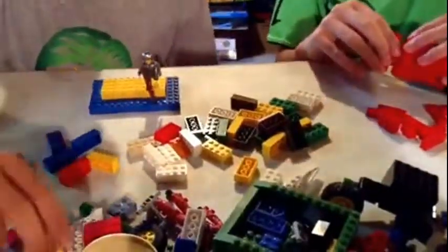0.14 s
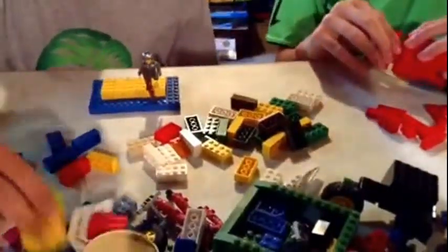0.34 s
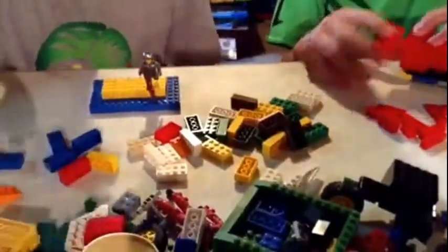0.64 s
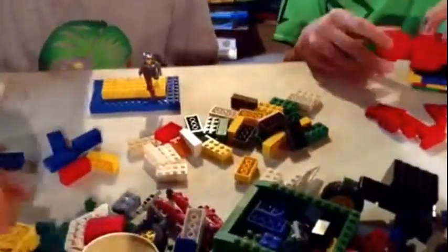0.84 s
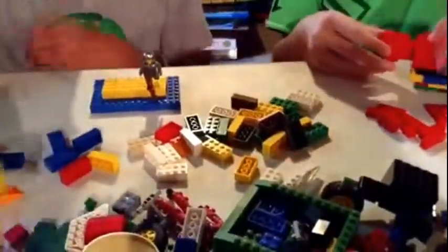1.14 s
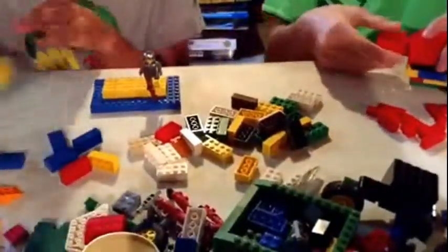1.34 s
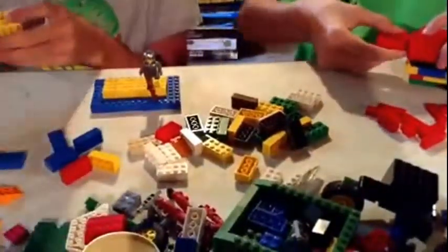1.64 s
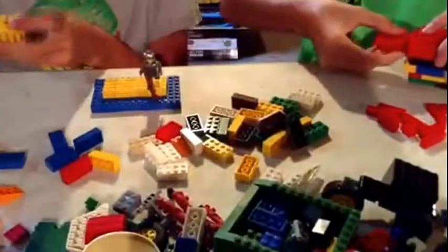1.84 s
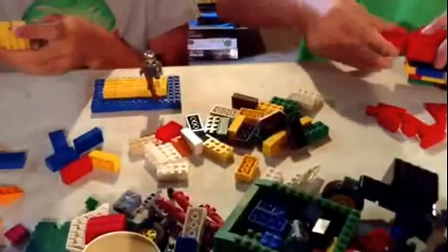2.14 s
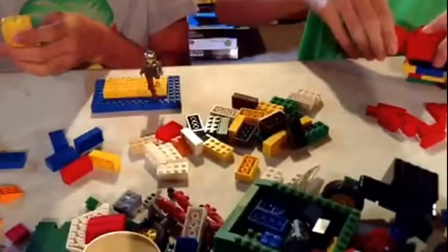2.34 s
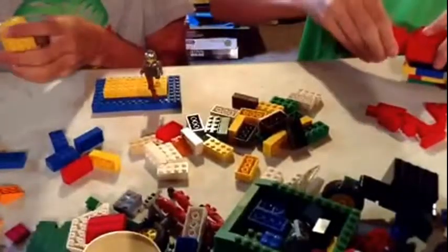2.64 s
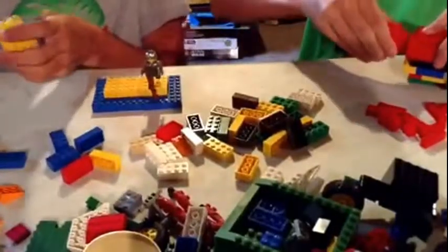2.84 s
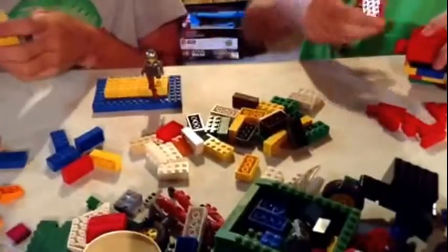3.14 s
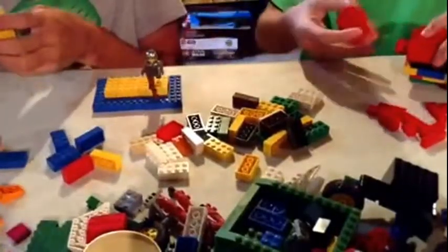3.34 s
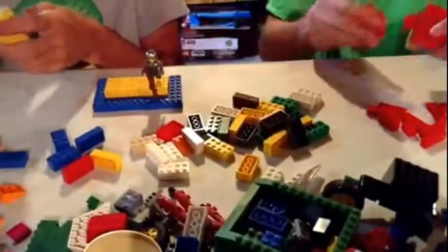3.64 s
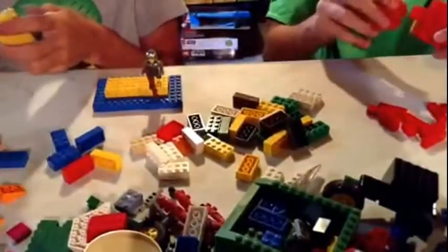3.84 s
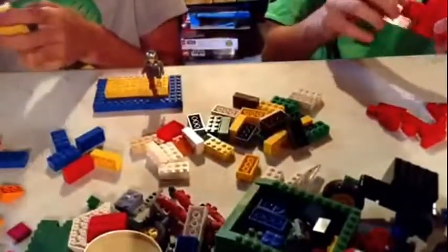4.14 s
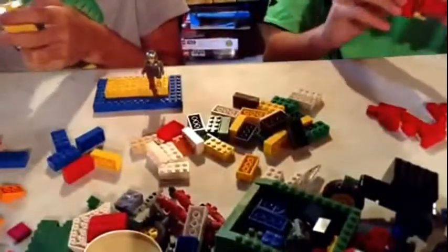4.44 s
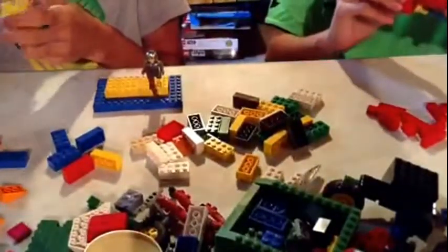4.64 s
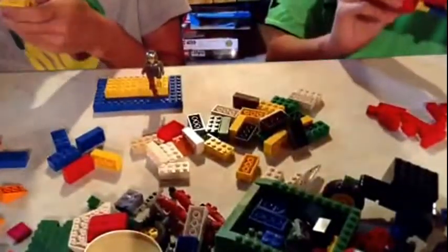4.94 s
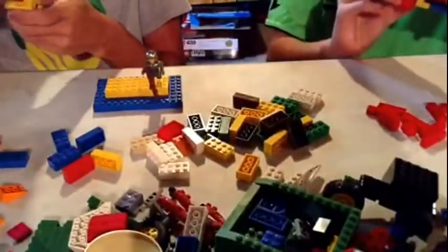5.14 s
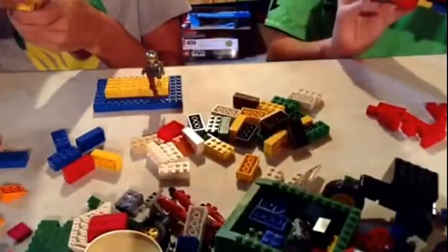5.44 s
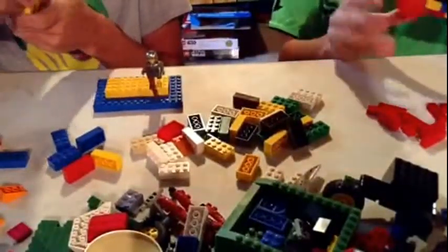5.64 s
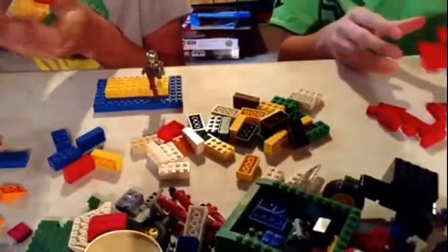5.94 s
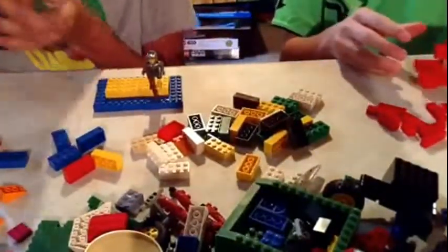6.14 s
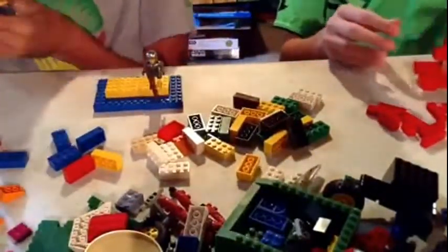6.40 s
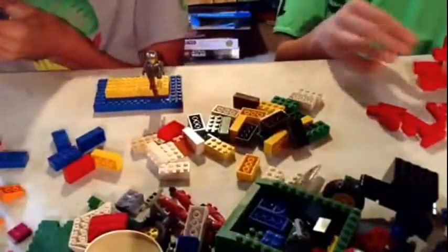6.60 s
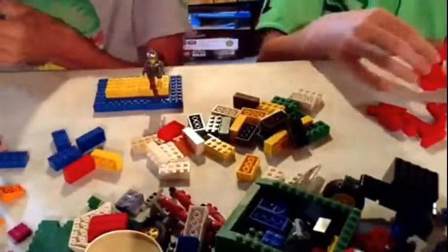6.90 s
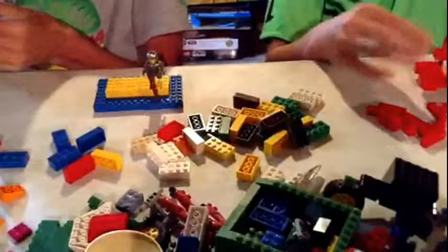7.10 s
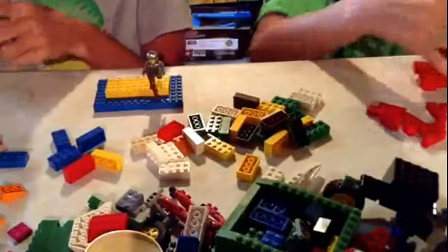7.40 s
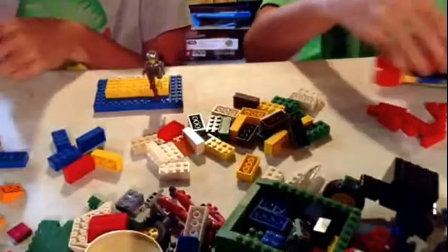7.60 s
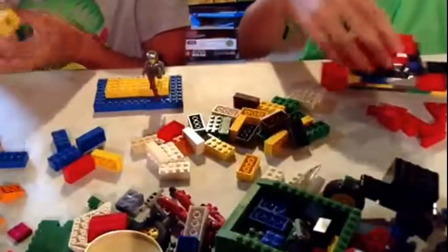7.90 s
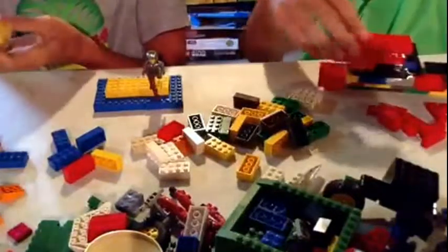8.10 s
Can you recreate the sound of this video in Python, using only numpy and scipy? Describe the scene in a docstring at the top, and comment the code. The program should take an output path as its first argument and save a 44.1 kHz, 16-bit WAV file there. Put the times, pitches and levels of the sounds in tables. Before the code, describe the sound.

Plastic building bricks crack and rattle in three quick flurries as they are pressed together, pulled apart and pushed over a wooden tabletop. After the third and sharpest flurry, isolated clicks and soft rubbing follow, then a dull knock and a brief slide. A fan hums quietly in the small, slightly echoing room, and the sound is mono from a close phone microphone.

```python
"""Hollow plastic bricks are pressed together, pulled apart and pushed over a wooden table by four hands.
Each contact cracks, rings the brick's hollow and thumps the table top.
Dragged bricks scrape the wood and rattle; held ones rub against each other.
The small living room echoes, a fan hums in the background, and a phone close by records in mono."""
import sys
import numpy as np
from scipy import signal
from scipy.fft import rfft, irfft
from scipy.io import wavfile
from scipy.ndimage import uniform_filter1d

SR = 44100
rng = np.random.default_rng(int(sys.argv[2]) if len(sys.argv) > 2 else 0)


def generate_wav(sig):
    """Save sig (samples, or channels by samples) to the path in sys.argv[1] as 16-bit PCM at SR."""
    pcm = np.round(np.clip(np.atleast_2d(sig).T, -1, 1) * 32767).astype(np.int16)
    wavfile.write(sys.argv[1], SR, pcm)


N = 364266
TOP_HZ = 15400  # the highest pitch the phone keeps


def undb(db):
    """Turn decibels into a number to multiply by."""
    return 10 ** (np.asarray(db) / 20)


def unit(x):
    """Scale to an average (rms) level of 1."""
    return x / np.sqrt(np.mean(x ** 2))


def peak(x):
    """Scale each row to a peak of 1."""
    return x / np.abs(x).max(axis=1, keepdims=True)


def resonate(x, tones):
    """Let x ring at each (pitch, width, level); every second tone is flipped."""
    return sum((-1) ** k * undb(db) * signal.lfilter(*signal.iirpeak(hz, hz / width, SR), x)
               for k, (hz, width, db) in enumerate(tones))


def wander(per_s):
    """A smooth random wobble, about 1 in size."""
    hold = int(SR / per_s)
    steps = np.repeat(rng.standard_normal(N // hold + 1), hold)
    return 1.3 * uniform_filter1d(uniform_filter1d(steps, hold), hold)[:N]


def clicks(per_s, spread_db):
    """Tiny random clicks, a few louder than the rest."""
    happens = rng.random(N) < per_s / SR
    size = undb(spread_db * np.minimum(rng.exponential(size=N), 3))
    return unit(happens * size * np.sign(rng.standard_normal(N)))


def shove(t, start, length, rise_s, fall_db_per_s):
    """The strength of a hand's push: it rises, holds, then fades."""
    return np.clip((t - start) / rise_s, 0, 1) * undb(-fall_db_per_s * np.maximum(t - start - length, 0))


# The tones of the fan's hum: (pitch [Hz], level [dB])
FAN_TONES = [(232.8, -55.5), (1335, -71)]
# How strong the rushing air is, from low to high: (pitch [Hz], relative level [dB])
FAN_AIR = [(60, -28), (90, -36), (145, -24), (200, -18.5), (330, -25), (770, -27.5), (1300, -32),
           (1700, -34), (2300, -41), (5000, -43.5), (14800, -49), (16000, -72)]


def fan(air_db=-54, flicker_below_hz=1800):
    """A fan's wavering hum over rushing air, whose low part flickers a little."""
    t, freqs = np.arange(N) / SR, np.fft.rfftfreq(N, 1 / SR) + 1
    hum = sum(np.sqrt(2) * undb(db + 1.5 * wander(22)) * np.sin(2 * np.pi * hz * t + .5 * wander(2.6))
              for hz, db in FAN_TONES)
    hz, db = np.transpose(FAN_AIR)
    spectrum = rfft(rng.standard_normal(N)) * undb(np.interp(np.log(freqs), np.log(hz), db))
    low = 1 / (1 + (freqs / flicker_below_hz) ** 4)
    air = irfft(spectrum * low, N) * undb(0.17 * wander(14)) + irfft(spectrum * (1 - low), N)
    return hum + undb(air_db) * unit(air)


def plastic_crack(t, rise, treble_db, slip_s=0.0041, shell_fade_s=0.013, low_hz=2200, treble_hz=7000):
    """Plastic slips in tiny jerks and its thin shell rings. Gives the near sound and the one to echo."""
    count = len(treble_db)
    noise = rng.standard_normal((count, len(t)))
    slips = np.sign(noise) * np.abs(noise) ** 1.4 * rise * np.exp(-t / slip_s)  # spiky noise
    slips /= np.linalg.norm(slips, axis=1, keepdims=True)
    pitch, phase = rng.random((2, count, 8, 1))  # eight random shell tones per contact
    shell = np.sin(2 * np.pi * (low_hz * 6.5 ** pitch * t + phase)).sum(axis=1)
    shell *= rise * undb(-60 * t / shell_fade_s)
    shell *= undb(-2) / np.linalg.norm(shell, axis=1, keepdims=True)
    # over all directions, the slips even out to one plain click
    to_walls = np.zeros_like(slips)
    to_walls[:, 0] = undb(0.5)
    crack = signal.lfilter(*signal.butter(2, low_hz, "high", fs=SR), [slips + shell, to_walls])
    treble = signal.lfilter(*signal.butter(1, treble_hz, "high", fs=SR), crack)
    return undb(8) * (crack + (undb(treble_db) - 1) * treble)


# The tones of a brick's hollow: (pitch [times the main pitch], level [dB], time to fade by 60 dB [s])
HOLLOW_TONES = [(1, -2.5, 0.0094), (1.2, -9.5, 0.0041), (.82, -10.5, 0.0062)]


def hollow_ring(t, rise, hz):
    """The hollow rings briefly; bricks differ in shape, so the side tones shift a little."""
    ring = 0
    for k, (ratio, db, fade_s) in enumerate(HOLLOW_TONES):
        phase, shape = rng.standard_normal((2, len(hz), 1))
        shift = 1 + .08 * np.tanh(shape) if k else 1
        ring += undb(db - 60 * t / fade_s) * np.sin(2 * np.pi * (ratio * shift * hz * t + phase))
    return peak(ring * rise ** 2)


# The tones of the table top, then of its frame: (pitch [Hz], width [Hz], level [dB])
TOP_TONES = [(255, 88, 0.5), (381, 200, 2), (440, 200, 3.5), (573, 292, 5), (794, 437, 6.5),
             (972, 290, 5.5), (1310, 373, -3.5), (1970, 700, -14.5)]
FRAME_TONES = [(144, 34, 4), (280, 480, -1.5), (396, 192, 3)]
# The note of each spot where bricks land: (from time [s], pitch [Hz], level next to the thump [dB])
LANDING_SPOTS = [(0, 600, -0.5), (.535, 359, 0.5), (.56, 263, 2), (.6, 520, 4), (.63, 350, -2),
                 (.67, 377, -2.5), (.7, 600, -2.5), (.79, 262, 5.5), (.85, 810, -6.5), (1.9, 900, -12),
                 (3.3, 663, -6.5), (3.404, 920, -4.5), (3.5, 905, -2.5), (3.55, 291, 10.5), (4, 280, -3),
                 (7, 650, -0.5)]


def table_thump(t, starts, thump_db, push_s=0.003, spot_fade_s=0.033):
    """A short push shakes the table top; the heavier it is, the more it reaches the frame."""
    push = rng.standard_normal((len(starts), len(t))) * np.exp(-t / push_s)
    top = peak(resonate(push, TOP_TONES))
    frame = undb(0.48 * thump_db - 12) * peak(resonate(push, FRAME_TONES))
    since, spot_hz, spot_db = np.transpose(LANDING_SPOTS)
    spot = np.clip(np.searchsorted(since, starts) - 1, 0, None)
    hz = spot_hz[spot] * (1 + .03 * rng.standard_normal(starts.shape))
    note = undb(spot_db[spot] - 60 * t / spot_fade_s) * np.sin(2 * np.pi * hz * t)
    return undb(thump_db) * (top + frame + note)


# Each time a brick hits something; ring, thump and treble count up or down from its level:
# (time [s], level [dB], ring [dB], pitch of the hollow [Hz], thump [dB], crack's treble [dB])
BRICK_CONTACTS = [(0.043, -45.5, 2, 4750, -1.5, 14), (0.055, -26, -27, 3240, -22.5, -0.5),
                  (0.124, -34.5, -19, 4500, -20, -6), (0.2108, -41.5, -6, 2970, 1.5, 8),
                  (0.347, -32.5, -21, 5740, -9.5, -5), (.3661, -33, -1, 3600, -12, 13),
                  (0.38, -30.5, -1, 3150, -3.5, -1), (.403, -22, -4, 3220, -15, -22),
                  (.482, -5.5, -12, 3800, -18.5, -16), (.494, -13.5, -4, 3670, -13, -10),
                  (0.5266, -11.5, -8.5, 2190, -9, 8), (0.5433, -4.5, -11.5, 4630, -6.5, -16),
                  (0.5753, -27.5, -12, 2250, 5.5, -11), (0.6069, -31, 2, 2200, 3.5, -21),
                  (0.637, -11, -11, 3830, -1, -19), (0.6497, -7, -11, 4450, -28, 4.5),
                  (.6664, -4, -23, 2740, -7.5, -15), (0.6746, -0.5, -10.5, 2640, -10.5, -9),
                  (0.7121, -14.5, -17, 2460, -1, 0), (0.7347, -10.5, -14, 2260, -5, -21),
                  (0.8003, -25, -6, 2580, 4, -21), (0.9043, -45, -17, 3040, 19.5, -14),
                  (1.096, -20, -7, 4500, -13, -1.5), (1.117, -26.5, -0.5, 2260, -2, -13),
                  (1.169, -52.5, -12, 2080, 19.5, -9), (1.3409, -42, -7, 2330, 7.5, -17),
                  (1.5325, -28, -1, 4500, -17, 5.5), (1.945, -34.5, -6.5, 2630, -6.5, -19),
                  (1.9658, -31, -2.5, 1850, -13, -16), (1.975, -32, -15, 4500, -9, -7),
                  (2.0034, -23.5, -6.5, 2750, -10.5, -24), (2.122, -30.5, -3, 2850, -3, -17),
                  (2.145, -21, -10.5, 2080, -18, -14), (2.1522, -25.5, -11, 4300, -24, 6.5),
                  (2.171, -24.5, -5, 3840, -18, -17), (2.2, -20.5, -14, 4660, -13, -1),
                  (2.2428, -16.5, -6.5, 2420, -12, -12), (2.247, -9.5, -10, 2450, -16, -12),
                  (2.291, -12.5, -14, 4300, -22, 3), (2.305, -16, -11, 3880, -25, 0),
                  (2.3173, -7.5, -19, 5960, -43, -3), (2.3244, -21, -10, 3530, -17, 8),
                  (2.3543, -12.5, -15, 5630, -16, -19), (2.424, -33, -12, 4830, -20, -7),
                  (2.4358, -20.5, -10, 5160, -5, -24), (2.455, -26.5, -6, 3300, -4, 3),
                  (2.4733, -10, -20, 5630, -19, -16), (2.5165, -25, -2, 5500, -24, -4),
                  (2.5417, -8, -12, 4180, -12.5, -27), (2.5717, -22, -7, 2350, -13, -13),
                  (2.599, -11, -16, 3290, -8.5, -25), (2.6154, -11, -8, 5300, -8, -28),
                  (2.6242, -4.5, -15, 4400, -45, -28), (2.6388, -9.5, -11, 4300, -11, -25),
                  (2.687, -33, -20, 8500, -23, 12), (2.6946, -7, -15, 4150, -30, -23),
                  (2.7001, -6, -25, 4200, -13.5, -28), (2.7735, -39, -24, 4350, 11, 16),
                  (2.8483, -25.5, -8, 2500, -4, -7), (2.859, -21, -7.5, 2500, -6.5, 2),
                  (3.1314, -39.5, 4, 6200, -38, 15.5), (3.1505, -33.5, -10.5, 5350, -25, 15),
                  (3.323, -29.5, -5, 6400, -19.5, -15.5), (3.3995, 1.5, -23.5, 6360, -10, 0.5),
                  (3.408, -10, -17, 6300, -11.5, -3), (3.4268, -3, -27.5, 2340, -31, -13.5),
                  (3.447, 1, -19, 3400, -17, -27), (3.461, -7, -10, 5500, -45, -6),
                  (3.4777, -11.5, -4, 2500, -21, -7), (3.494, -4, -19, 2780, -16, 0),
                  (3.508, -9.5, -10, 1900, -11, -11), (3.5256, -9.5, -13, 7430, -18, -5),
                  (3.579, -29, 1.5, 4900, -3.5, 13.5), (4.1178, -22.5, -15, 4540, -22, -3),
                  (4.2268, -38, -3, 4620, -24, 3), (4.4347, -36.5, 9.5, 4310, -17, 12.5),
                  (4.45, -42, -1, 3940, -27, -15), (4.4698, -28.5, -2.5, 4620, -29, -2),
                  (4.566, -22.5, -0.5, 4600, -22, 1.5), (4.696, -32.5, 8.5, 4430, -63, 7.5),
                  (4.84, -35.5, 0, 4450, -35, -14), (4.8722, -33.5, -8, 4400, -45, 1.5),
                  (5.044, -30.5, -17, 5570, -13.5, -13), (5.077, -36, -18, 5450, -27, 0),
                  (5.2493, -23, -15, 5000, -56, -5), (5.2525, -6, -19, 4960, -26.5, -0.5),
                  (5.4146, -18, 1, 4390, -53, -11), (5.4219, -11.5, -6.5, 4080, -27, -1),
                  (6.1761, -21, -6, 2970, 4, -25), (6.1837, -36.5, -4, 2500, 11, -20),
                  (6.1992, -19, -8, 2530, 3.5, -21), (6.8442, -43.5, -1, 4240, -3, -17),
                  (6.9842, -21.5, -8, 4400, -42, -16), (7.1354, -34, -16, 3540, -23, -8),
                  (7.2533, -30, -8, 4450, -18, -29), (7.6068, -29, 0, 4700, -30, 4),
                  (7.63, -14.5, -2.5, 4370, -19, -0.5), (7.6542, -14, -32, 3630, -9.5, -5),
                  (7.9466, -33.5, -24, 4940, -6, 6)]


def contacts(rise_s=0.00031):
    """Each contact cracks, rings and thumps. Gives the sound at the phone and towards the walls."""
    starts, level_db, ring_db, hz, thump_db, treble_db = np.transpose(BRICK_CONTACTS)[:, :, None]
    t = np.arange(2048) / SR
    rise = 1 - np.exp(-t / rise_s)
    near, to_walls = plastic_crack(t, rise, treble_db)
    body = undb(ring_db) * hollow_ring(t, rise, hz) + table_thump(t, starts, thump_db)
    paths = undb(level_db) * np.array([near + body, to_walls + undb(-4) * body])
    at = (starts * SR).astype(int) + np.arange(len(t))  # where each hit goes in the track
    return [np.bincount(at.ravel(), hits.ravel(), N + len(t))[:N] for hits in paths]


# The room's echo, from low to high: (pitch [Hz], time to fade by 60 dB [s], relative level [dB])
ECHO_BANDS = [(186, 0.16, 1), (505, 0.41, -3), (1287, 0.25, -2), (2500, 0.39, -5.5), (5000, 0.1, -3),
              (8260, 0.3, -8), (15100, 0.074, -9)]


def room_echo(x, build_s=0.008, echo_db=5, early_db=-9):
    """Faint early echoes off clutter, then dense ones off near walls; the highest pitches die first."""
    t, tail = np.arange(SR // 2) / SR, 0
    for hz, fade_s, db in ECHO_BANDS:
        edges = [hz / 1.55, min(hz * 1.55, TOP_HZ + 1000)]
        noise = rng.standard_normal(len(t))
        band = signal.sosfilt(signal.butter(2, edges, "band", fs=SR, output="sos"), noise)
        band *= undb(-60 * t / fade_s) * np.clip((t / build_s) ** 4, undb(early_db), 1)
        tail += band * undb(db + echo_db) * np.sqrt(hz / SR / np.sum(band ** 2))
    return signal.fftconvolve(x, tail)[:N]


# The tones of rattling bricks: (pitch [Hz], width [Hz], level [dB])
RATTLE_TONES = [(2330, 670, 13), (4500, 1900, 10), (6350, 2700, 6.5), (10100, 4100, -1),
                (12800, 1200, -14.5)]
# Pushes across the wood: (time [s], length [s], scrape [dB], rattle [dB], frame shake [dB])
BRICK_DRAGS = [(0.362, 0.07, -48.5, -48.5, -47), (0.477, 0.034, -40, -34.5, -67),
               (0.573, 0.07, -37, -68, -65), (0.7, 0.072, -38.5, -45, -62),
               (0.793, 0.024, -36.5, -46, -36.5), (0.89, 0.017, -43.5, -67, -37.5),
               (0.992, 0.026, -47, -61, -42), (1.154, 0.073, -59, -73, -50.5),
               (1.323, 0.053, -53, -66.5, -50), (1.951, 0.05, -46.5, -48.5, -51.5),
               (2.123, 0.11, -41.5, -46, -59), (2.266, 0.11, -41.5, -41, -51),
               (2.505, 0.14, -39, -41, -47.5), (2.694, 0.018, -37, -34, -62), (2.843, 0.015, -45, -44, -40),
               (3.396, 0.11, -37, -37.5, -46.5), (3.518, 0.058, -41.5, -42, -50.5),
               (6.19, 0.037, -37.5, -53, -47.5), (7.228, 0.065, -71, -59, -52),
               (7.468, 0.04, -77, -78, -48), (7.505, 0.081, -47, -55.5, -40),
               (7.637, 0.11, -41.5, -55, -39.5), (7.781, 0.17, -39.5, -53, -43)]


def drags(rise_s=0.009, fall_db_per_s=346):
    """Studs stutter over the wood, bricks tick together, and a leaning hand shakes the frame."""
    t, gains = np.arange(N) / SR, np.zeros((3, N))
    for start, length, *levels_db in BRICK_DRAGS:
        push = shove(t, start, length, rise_s, fall_db_per_s)
        gains = np.hypot(gains, undb(levels_db)[:, None] * push)
    stutter = clicks(per_s=1500, spread_db=3) * undb(2 * wander(40))
    ticks = clicks(per_s=5000, spread_db=3) * undb(3 * wander(70))
    scrape = unit(resonate(stutter, TOP_TONES))
    rattle = unit(resonate(ticks, RATTLE_TONES))
    shake = unit(resonate(stutter, FRAME_TONES))
    return np.sum(gains * [scrape, rattle, shake], axis=0)


# Studs rubbing in the hands: (time [s], length [s], level [dB], pitch of the hollow [Hz], width [Hz])
BRICK_RUBS = [(0.483, 0.043, -53, 3750, 120), (2.613, 0.088, -42.5, 4010, 60),
              (4.84, 0.12, -56.5, 4510, 250), (6.969, 0.028, -53, 4430, 200), (7.64, 0.012, -33, 3730, 200)]


def rubs(hiss_db=-14, rise_s=0.0029, fall_db_per_s=897):
    """Fine slips between two bricks keep the hollow singing over a thin hiss."""
    t, sound = np.arange(N) / SR, 0
    slips = clicks(per_s=2500, spread_db=2)
    hiss = undb(hiss_db) * unit(resonate(slips, RATTLE_TONES[1:]))
    for start, length, db, hz, width in BRICK_RUBS:
        singing = unit(resonate(slips, [(hz, width, 0)]))
        sound += undb(db) * shove(t, start, length, rise_s, fall_db_per_s) * (singing + hiss)
    return sound


def scene():
    """The bricks, their echo and the fan, in one channel."""
    near, to_walls = contacts()
    sliding = drags() + rubs()
    bricks = near + sliding + room_echo(to_walls + sliding)
    bass_cut = signal.butter(3, 125, "high", fs=SR, output="sos")  # the table is too small for deep bass
    return (signal.sosfilt(bass_cut, bricks) + fan())[None]


def record(dry):
    """The phone thins the bass and cuts the highest pitches."""
    thin = signal.sosfilt(signal.butter(2, 135, "high", fs=SR, output="sos"), dry)
    return signal.sosfilt(signal.ellip(10, .2, 90, TOP_HZ, fs=SR, output="sos"), thin)


dry = scene()
out = record(dry)
generate_wav(out)
```